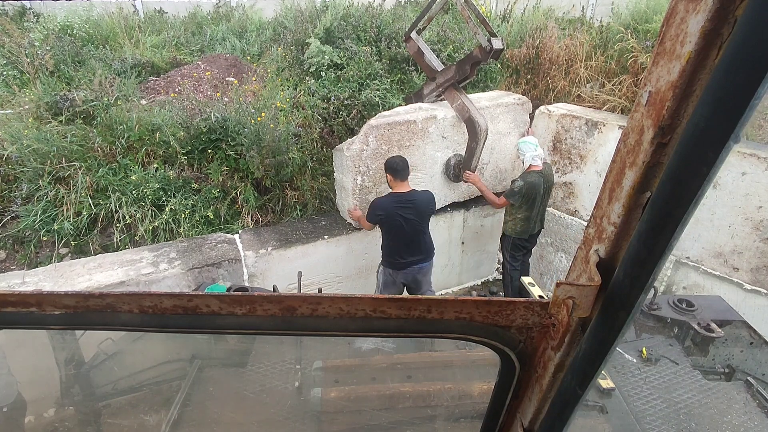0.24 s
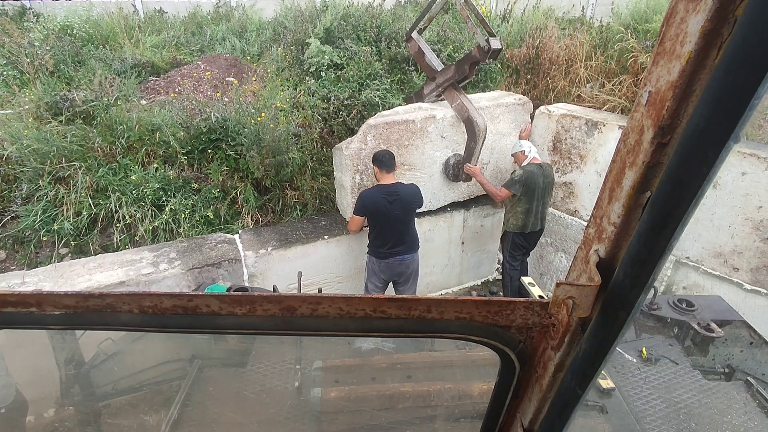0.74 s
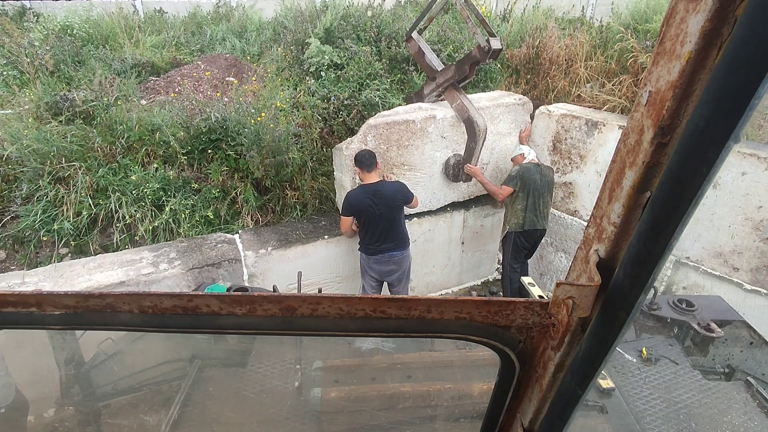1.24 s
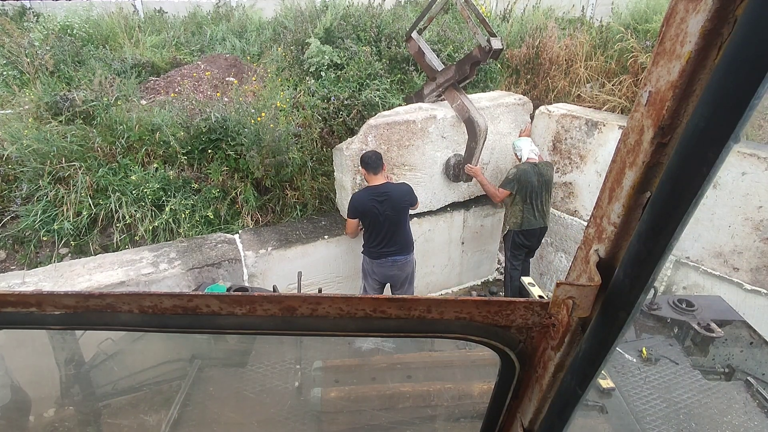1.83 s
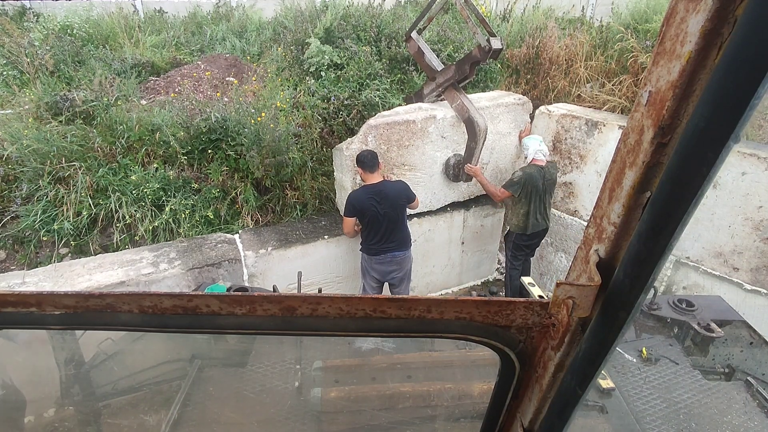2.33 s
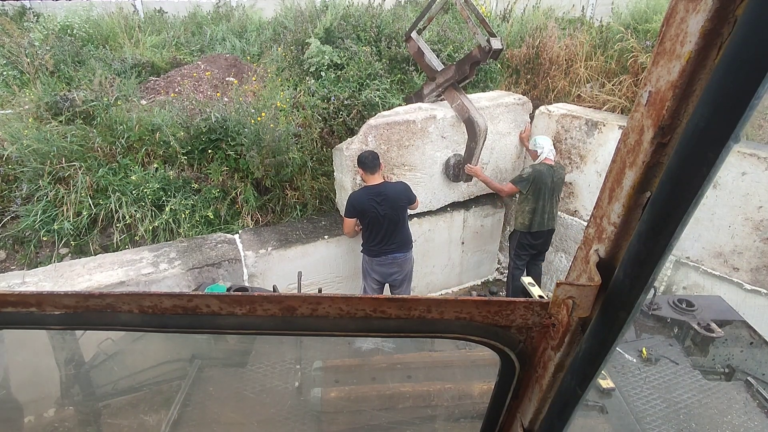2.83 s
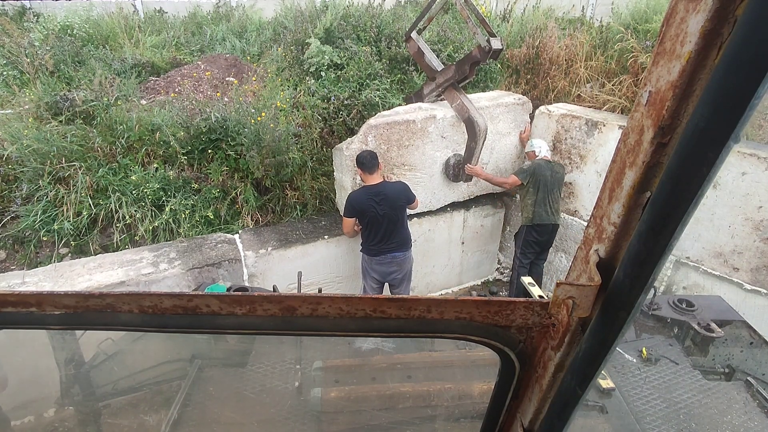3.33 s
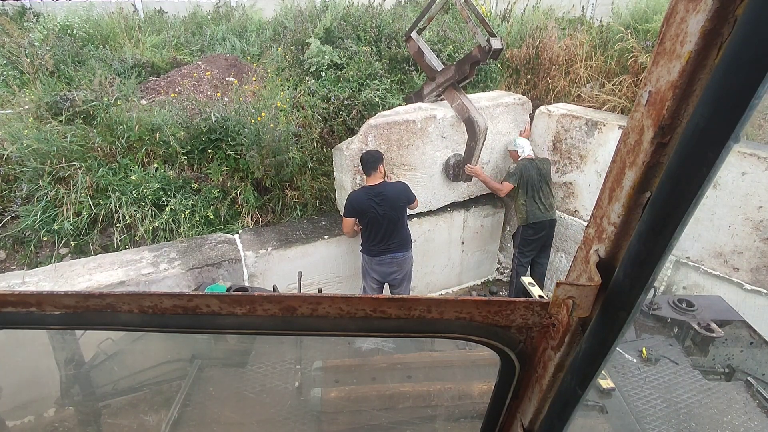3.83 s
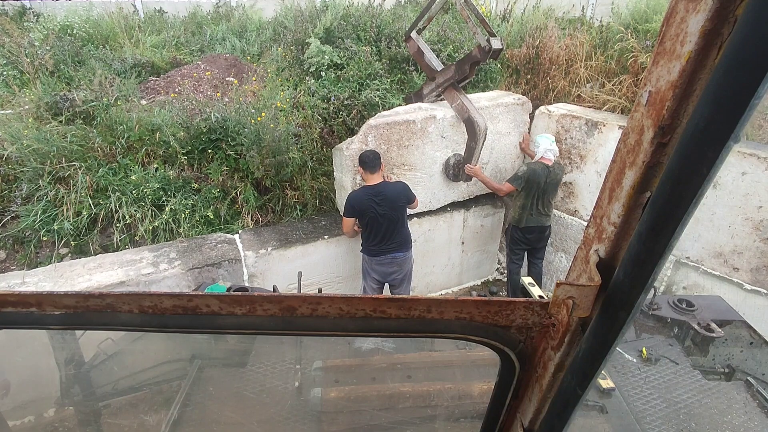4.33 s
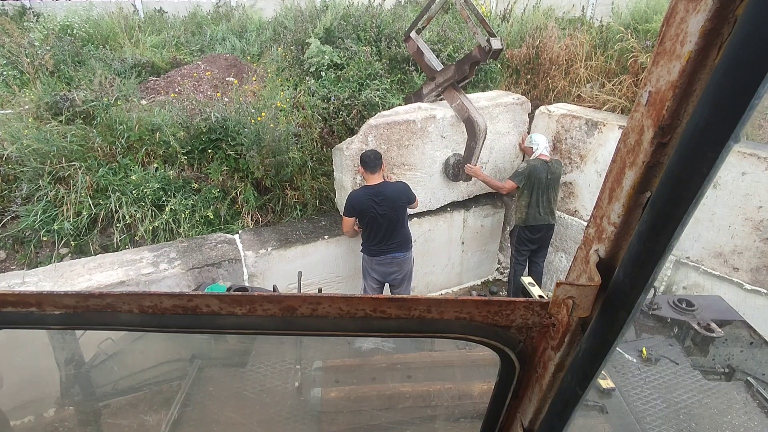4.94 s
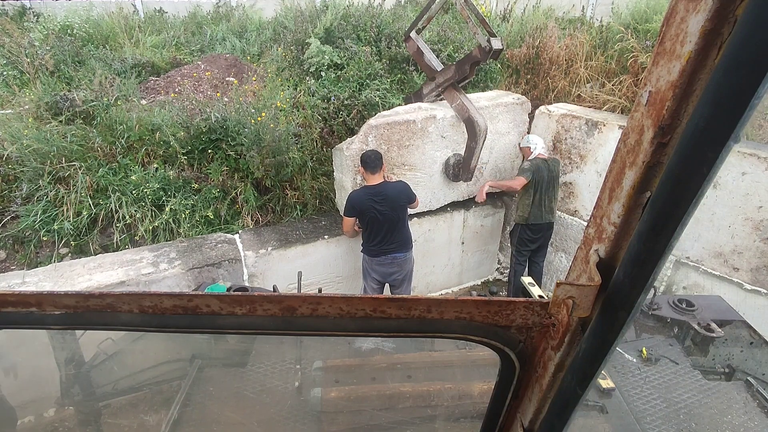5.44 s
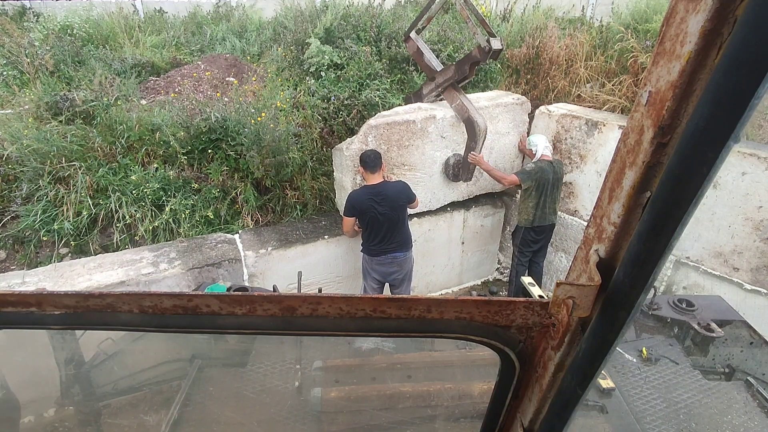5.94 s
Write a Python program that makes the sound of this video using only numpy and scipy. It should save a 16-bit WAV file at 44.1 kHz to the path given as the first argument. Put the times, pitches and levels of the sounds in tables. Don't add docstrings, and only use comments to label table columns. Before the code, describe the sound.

Inside a crane cab, a diesel engine idles with deep rumble, clatter and loose panel knocks, then hydraulic oil hisses in spurts at the very end.

```python
import sys
import numpy as np
from scipy import signal
from scipy.fft import dct
from scipy.io import wavfile
from scipy.ndimage import uniform_filter1d

SR = 44100
rng = np.random.default_rng(int(sys.argv[2]) if len(sys.argv) > 2 else 0)


def volts(x):
    e = np.asarray(x, float) / 20
    return 10 ** e


def log_audio(samples):
    frames = np.atleast_2d(samples).T
    limited = np.clip(frames, -1, 1)
    pcm = np.round(limited * 32767).astype(np.int16)
    wavfile.write(sys.argv[1], SR, pcm)


N = 273358

# start_s, opening (0-1)
VALVE = [
    (0, 0.05),
    (5.84, 0.06),
    (5.93, 0.6),
    (6.0, .95),
    (6.2, 1),
]
# centre_s, gain_db, half_length_s
BURSTS = [
    (5.952, 3, 0.045),
    (5.995, 2, 0.012),
    (6.031, 3.5, 0.014),
    (6.068, 4, 0.0095),
    (6.112, 4.5, 0.015),
    (6.135, 3.5, .008),
    (6.155, 6, 0.012),
]
# pitch_hz, likeness (0-1)
LIKENESS = [(35, .9999), (60, .99), (120, .991), (260, .975), (410, .9), (670, .3), (1080, 0), (6500, 0),
            (9000, .7), (14000, .5)]


def rms_one(x):
    return x / np.sqrt(np.mean(x ** 2) + 1e-20)


def in_time(rows):
    s, *columns = np.transpose(rows)
    return [np.interp(np.arange(N) / SR, s, c) for c in columns]


def at_hz(points, hz):
    pitch_hz, value = np.transpose(points)
    return np.interp(np.log(hz), np.log(pitch_hz), value)


def swells(rows, s):
    return sum(db * np.exp(-((s - at) / half) ** 2) for at, db, half in rows)


def drift(rate):
    r = np.exp(-80 * np.pi * rate / SR)
    noise = rng.standard_normal(N // 40 + 2002)
    slow = signal.lfilter([1], [1, -2 * r, r * r], noise)[2000:]
    return np.interp(np.arange(N) / 40, np.arange(len(slow)), rms_one(slow))


def resonance(x, hz, width):
    r = np.exp(-np.pi * width / SR)
    zeros = np.array([1, 0, -1]) * (1 - r * r) / 2
    return signal.lfilter(zeros, [1, -2 * r * np.cos(2 * np.pi * hz / SR), r * r], x)


def ports(hz):
    # pitch_hz, level_db
    shade = [(260, 0), (410, -.8), (520, -3), (670, -7), (1080, -11.5), (2000, -16), (4000, -21),
             (7000, -26), (10000, -16), (13000, -4), (15500, 0)]
    left = volts(at_hz(shade, hz))
    return np.array([[left], [1]]) * 2 / (1 + left)


def spread(mid, side, hz):
    alike = np.clip(at_hz(LIKENESS, hz), -1, 1)
    return np.sqrt(1 + alike) * mid + np.sqrt(1 - alike) * side * [[1], [-1]]


def banded_noise(spectrum, patchy_db, patch_rate):
    low_hz, top_hz = spectrum[0][0], spectrum[-1][0]
    edges = np.geomspace(low_hz, top_hz, int(3 * np.log2(top_hz / low_hz)) + 2)
    out, together, white = 0, drift(patch_rate), rng.standard_normal((2, 2, N))
    for k, (low, high) in enumerate(zip(edges, edges[1:])):
        band_pass = signal.butter(2, [low, high], "band", fs=SR, output="sos")
        mid, side = signal.sosfilt(band_pass, white[k % 2])
        hz = np.sqrt(low * high)
        flicker_db = patchy_db * (0.83 * together + drift(patch_rate))
        gain = volts(at_hz(spectrum, hz) + flicker_db)
        out = out + gain * ports(hz) * spread(mid, side, hz)
    return out / np.sqrt(np.mean(out.mean(axis=0) ** 2))


def narrow_hiss(noise, hz, width):
    return rms_one(resonance(resonance(noise, hz, width), hz, width))


def microphone_hiss():
    # pitch_hz, level_db (per Hz)
    hiss_spectrum = [(7500, -16), (8900, -16), (10500, -8), (11800, -3), (13300, -12), (14300, -7),
                     (15000, -2), (15500, 0)]
    return volts(-84.5) * banded_noise(hiss_spectrum, patchy_db=3.5, patch_rate=12.0)


def whistles():
    # pitch_hz, width_hz, level_db
    whistle_bands = [(11000, 200, -95), (11800, 150, -90), (12400, 250, -94), (14650, 300, -88),
                     (15300, 250, -85)]
    noise = rng.standard_normal(N) + .6 * rng.standard_normal((2, N))
    together, out = drift(3.0), 0
    for hz, width, db in whistle_bands:
        out = out + volts(db + 2 * together + 5 * drift(16.0)) * narrow_hiss(noise, hz, width)
    return out


def rumble(stumble_db):
    # pitch_hz, width_hz, level_db
    cab_modes = [(9.7, 12, -15.5), (26, 26, -10), (39.3, 19, 1), (60.6, 22, 0.5), (90, 18, -10),
                 (117, 24, -2.5), (186.3, 36, -5), (199.5, 13, -9), (232, 36, -19.5), (329.6, 55, -11.5),
                 (378.3, 28, -13), (414.4, 76, -12), (512, 20, -16.5), (531.8, 44, -17), (1230, 70, -26.5)]
    mid, side = rng.standard_normal((2, N))
    boom = 0
    for k, (hz, width, mode_db) in enumerate(cab_modes):
        push = spread(mid, side, hz)
        mode = resonance(resonance(push, hz, 1.5 * width), hz, 1.5 * width)
        power = np.mean(mode ** 2, axis=0)
        swell = uniform_filter1d(power, size=3500) / np.mean(power)
        evened = mode / (swell + .05) ** .35
        boom = boom + (-1) ** k * volts(mode_db) * ports(hz) * evened
    return volts(-23 + 0.44 * np.minimum(stumble_db, 4)) * rms_one(boom)


def thumps():
    # start_s, peak_db, pitch_hz
    heavy_firings = [(1.0, -19, 121), (1.096, -20, 132), (1.182, -24, 117), (4.565, -16, 194),
                     (4.663, -22, 114), (4.669, -15.5, 197), (4.696, -19.5, 151), (4.751, -12.5, 119.6),
                     (4.763, -12.5, 162), (5.117, -17.5, 128), (5.125, -18, 201.6), (5.158, -12.5, 126),
                     (5.738, -13.5, 90), (5.807, -15.5, 110), (5.897, -12.5, 102)]
    # start_s, peak_db, pitch_hz
    light_firings = [(0.908, -22, 181), (1.275, -19.5, 188), (1.579, -19.5, 181), (1.927, -21, 201),
                     (2.034, -20, 189), (2.342, -19, 193), (2.831, -19, 195), (2.926, -17.5, 186),
                     (3.202, -21, 167), (3.419, -17.5, 191), (3.758, -21, 185), (4.061, -17.5, 192),
                     (4.419, -18, 170), (4.85, -21, 143), (5.2, -18.5, 186), (5.345, -22.5, 206)]
    firings = heavy_firings + [(s - .003, db - 3.0, hz) for s, db, hz in light_firings]
    out, t = np.zeros(N + 6000), np.arange(6000) / SR
    envelope = (1 - np.exp(-t / 0.0011)) * np.exp(-t / 0.016)
    for s, peak_db, hz in firings:
        at = round(s * SR)
        out[at:at + len(t)] -= volts(peak_db) * envelope * np.sin(2 * np.pi * hz * t)
    return out[:N]


def panel():
    # start_s, peak_db, pitch_hz
    knocks = [(.1476, -28.5, 1210), (.5197, -28, 1276), (0.9634, -30.5, 1300), (2.0113, -27.5, 1250),
              (2.5631, -32, 1240), (2.7666, -32, 1245), (2.9048, -30, 1105), (2.9582, -28.5, 1230),
              (3.1687, -29, 1250), (3.469, -29, 1220), (3.7145, -31, 1210), (3.8367, -30, 1170),
              (3.9704, -30, 1270), (4.2078, -32, 1270), (4.3735, -29, 1150), (4.4104, -31, 1120),
              (4.8426, -23.5, 1210), (4.9503, -33, 1234), (5.117, -29, 1195), (5.2004, -25, 1224),
              (0.444, -28, 1240), (0.4952, -27.5, 1276), (0.9952, -23, 1280), (1.1645, -33.5, 1197),
              (1.446, -25.5, 1274), (1.529, -27.5, 1224), (1.5767, -20, 1153), (2.092, -28.5, 1280),
              (2.141, -27, 1214), (2.345, -25, 1250), (2.493, -22, 1213), (2.595, -31.5, 1260),
              (2.7212, -25, 1170), (2.824, -24, 1240), (3.065, -28, 1255), (3.205, -19, 1234),
              (3.7645, -27, 1283), (4.002, -39, 1110), (4.3211, -23.5, 1240), (4.481, -24, 1040),
              (4.6965, -21.5, 1246), (4.876, -25.5, 1240), (5.2512, -28, 1230), (5.338, -23.5, 1185),
              (5.4814, -22.5, 1160), (5.6833, -20, 1160), (5.7895, -27, 1190), (5.925, -25, 1080),
              (5.971, -25, 1320), (6.178, -39, 1420), (2.041, -31, 1160), (2.98, -26, 1250),
              (4.344, -29.5, 1210), (5.764, -30, 1210), (1.75, -30, 1270), (1.793, -26, 1260)]
    # start_s, peak_db, pitch_hz
    low_knocks = [(0.279, -27, 620), (0.728, -30, 630), (0.89, -27.5, 786), (1.38, -25, 956),
                  (1.896, -27, 650), (2.372, -31, 670), (2.772, -27, 775), (3.231, -27, 893),
                  (3.809, -26, 670), (4.206, -24.5, 760), (4.346, -28, 910), (4.419, -30, 673),
                  (4.793, -29, 620), (4.839, -32, 929), (5.116, -29.5, 720), (5.179, -23, 695),
                  (5.442, -26, 869), (5.528, -23, 990), (5.743, -29, 640)]
    # start_s, peak_db, pitch_hz, decay_s
    long_rings = [(1.902, -23.5, 1230, 0.014), (6.005, -33, 1160, 0.037), (6.085, -27, 1210, 0.013),
                  (6.125, -28.5, 1000, 0.0099), (6.075, -32, 407, .03), (5.43, -25.5, 873, 0.02),
                  (5.888, -28, 740, 0.025), (5.945, -27, 760, 0.014), (5.113, -27, 724, 0.0071),
                  (5.94, -29.5, 1410, 0.017), (5.955, -32, 1630, 0.012), (5.99, -26, 606, 0.045),
                  (6.025, -28, 723, 0.021), (6.048, -32, 1162, 0.031), (6.169, -27, 1458, 0.052)]
    hits = [(s, db + 0.5, hz, .007) for s, db, hz in knocks]
    hits += [(s - .003, db - 3.0, hz, .008) for s, db, hz in low_knocks]
    out, t = np.zeros(N + 6000), np.arange(6000) / SR
    blunt_start = 1 - np.exp(-t / 0.0034)
    for s, peak_db, hz, decay_s in hits + long_rings:
        at = round(s * SR)
        ring = np.exp(-t / decay_s) * np.sin(2 * np.pi * hz * t)
        out[at:at + len(t)] += volts(peak_db) * blunt_start * ring
    return out[:N] * volts([[-12], [4.5]])


def clatter(stumble_db, burst_db):
    # pitch_hz, level_db (per Hz)
    clatter_spectrum = [(540, -8), (640, -1.5), (780, -0.5), (1000, -4.5), (1240, -4.5), (1450, -7.5),
                        (1900, -10), (2500, -20.5), (3200, -14.5), (4000, -27), (4500, -29), (5200, -27),
                        (6300, -71), (8000, -65)]
    level_db = -36.79 + 0.31 * np.minimum(stumble_db, 0) + 1.5 * burst_db
    noise = volts(level_db) * banded_noise(clatter_spectrum, patchy_db=1.35, patch_rate=30.0)
    return signal.sosfilt(signal.butter(6, 6427, fs=SR, output="sos"), noise)


def oil(opening, burst_db):
    # pitch_hz, level_db (per Hz)
    rush_spectrum = [(2300, -5), (3200, 0.5), (4200, -8.5), (5200, -8), (6200, -12), (6700, -30)]
    # pitch_hz, level_db (per Hz)
    jet_spectrum = [(7500, -26), (10000, -15), (12000, -7), (13500, 0), (14500, 0), (15600, -12)]
    rush = volts(-49 + burst_db) * banded_noise(rush_spectrum, patchy_db=5.0, patch_rate=56.0)
    jet_db = -63.5 - 6.5 * (0.5 - opening) + .3 * burst_db
    jet = volts(jet_db) * banded_noise(jet_spectrum, patchy_db=1.0, patch_rate=22.0)
    jet = signal.sosfilt(signal.butter(8, 14700, fs=SR, output="sos"), jet)
    noise = rng.standard_normal(N) + .6 * rng.standard_normal((2, N))
    whistle = volts(-72 + .4 * burst_db) * narrow_hiss(noise, 14000, 400)
    return opening * (rush + jet + whistle)


def pump(opening, stumble_db):
    # start_s, level_db
    whine = [(0.0, -37.5), (1.69, -35), (2.11, -40.5), (2.16, -32), (2.5, -37.5), (3.95, -31.5),
             (4.07, -45), (4.11, -38), (4.42, -34.5), (4.7, -46.5), (5.06, -31), (5.11, -43.5),
             (5.37, -34.5), (5.4, -52), (5.51, -32.5), (5.91, -43), (5.945, -25.5), (5.97, -22.5),
             (6.03, -28.5), (6.06, -29.5), (6.11, -31), (6.2, -39)]
    # start_s, level_db
    drone = [(0.0, -26), (0.17, -22), (0.22, -32.5), (0.26, -22.5), (1.29, -25.5), (1.33, -33), (1.45, -20),
             (1.5, -30), (1.57, -24.5), (4.09, -25), (4.52, -23.5), (4.61, -27), (4.8, -20), (4.87, -25),
             (5.82, -25.5), (6.01, -32), (6.06, -23), (6.2, -28)]
    # order, idle_db, load_gain_db
    upper_orders = [(2, -35, 5.5), (3, -38.5, 4.5), (4, -45.5, 11.5), (6, -58.5, 17.5), (7, -59, 19),
                    (8, -65.5, 12), (9, -60.5, 12.5), (10, -64.5, 15.5), (11, -65, 17), (12, -60, 12),
                    (14, -68.5, 11), (15, -64.5, 18)]
    piston_hz, whine_order = 102.15, 4.987
    whine_db, = in_time(whine)
    drone_db, = in_time(drone)
    drone_db = -24.0 + 0.5 * (drone_db - drone_db.mean()) + 0.66 * stumble_db
    levels = [(whine_order, whine_db + 0.5), (1, drone_db)]
    for k, idle_db, load_db in upper_orders:
        level_db = idle_db + load_db * opening + stumble_db * min(1, 1.1 / k)
        if k == 2:
            level_db = level_db + swells([(4.2, 4.6, .3)], np.arange(N) / SR)
        levels.append((k, level_db))
    turn = 2 * np.pi * np.cumsum(piston_hz + .3 * drift(3.0)) / SR
    out, sway = 0, .6 * drift(4.0)
    for k, level_db in levels:
        is_whine = k == whine_order
        tremble = (.55 + .06 * k) * drift(4.0) + (.5 + .02 * k) * drift(9.0)
        shake = sway - np.pi / 2 + tremble * (.45 if is_whine else 1)
        load_flicker_db = 0 if is_whine else 4.5 * opening * min(1, k / 6) * drift(28.0)
        gain = np.sqrt(2) * volts(level_db + 1.3 * drift(5.6) + load_flicker_db)
        port_sway = .075 * np.sqrt(k) * drift(0.73) * [[.5], [-.5]]
        out = out + ports(k * piston_hz) * gain * np.sin(k * turn + shake + port_sway)
    return out


def scene():
    # centre_s, gain_db, half_length_s
    stumbles = [(0.08, -4.5, 0.0081), (0.24, -3, 0.028), (1.005, 5, 0.0068), (1.1, 8, 0.0087),
                (1.19, 2, 0.0069), (1.37, -4, 0.02), (1.67, -2.5, 0.013), (2.82, -1, 0.014),
                (4.04, -6, 0.022), (4.4, -4.5, 0.0062), (4.47, 1, 0.029), (4.58, 4, 0.037),
                (4.63, -10, 0.039), (4.68, 7.5, 0.035), (4.735, -9.5, 0.016), (4.768, 11, 0.0071),
                (4.81, 1, 0.013), (5.095, -16, 0.011), (5.14, 2.5, 0.023), (5.84, -10.5, 0.0089),
                (5.9, 4, 0.0079), (5.96, -2, 0.019)]
    opening, = in_time(VALVE)
    s = np.arange(N) / SR
    stumble_db, burst_db = swells(stumbles, s), swells(BURSTS, s)
    background = microphone_hiss() + whistles()
    engine = rumble(stumble_db) + thumps() + panel() + clatter(stumble_db, burst_db)
    return background + engine + oil(opening, burst_db) + pump(opening, stumble_db)


def starved(x):
    # pitch_hz, step_db (over the band's mean), spread_db (of the step)
    band_steps = [(60, -34, 1), (150, -22, 1), (300, -12, 2), (1500, -1, 3), (2200, 8, 4), (3000, 5.5, 3.5),
                  (3800, 6.5, 3.5), (4500, 11.5, 4), (5200, 9, 4), (5600, 12, 4), (6300, 9, 3),
                  (8000, 12, 3), (15000, 12.5, 5)]
    hop = 1024
    starts = np.arange(0, N + hop, hop)
    window = np.sin(np.pi * (np.arange(2 * hop) + .5) / 2 / hop)
    padded = np.pad(x, ((0, 0), (hop, 2 * hop)), "reflect")
    frames = padded[:, starts[:, None] + np.arange(2 * hop)] * window
    a, b, c, d = np.split(frames, 4, axis=2)
    lines = dct(np.dstack([-c[..., ::-1] - d, a - b[..., ::-1]]), type=4, norm="ortho")
    hz, s = (np.arange(hop) + .5) * SR / 2 / hop, starts / SR
    band = np.round(9 * np.log2(np.maximum(hz, 200) / 200)).astype(int)
    by_band = rng.standard_normal((2, len(s), band.max() + 1))[:, :, band]
    chance = .4 * rng.standard_normal((len(s), 1)) + .85 * by_band
    opening = np.interp(s, *np.transpose(VALVE))
    chance *= 1 - .5 * opening[:, None]
    mean = uniform_filter1d(uniform_filter1d(np.abs(lines), size=15, axis=2), size=5, axis=1)
    centre, step_db, spread_db = np.transpose(band_steps)
    step_db = np.interp(hz, centre, step_db) + np.interp(hz, centre, spread_db) * chance
    step = mean * volts(step_db - 2.0 * opening[:, None] * (hz < 5200)) + 1e-12
    lines = np.sign(lines) * np.floor(np.abs(lines) / step + .4) * step
    between_bursts = (opening > .72) & (swells(BURSTS, s) < 2.0)
    moving = (opening > .62) & (opening < .95)
    losses = [(between_bursts | moving, 1700, 2200), (moving, 5100, 6400), (opening > .5, 6400, 9000)]
    for when, low, high in losses:
        lines[:, when] *= 1 - .95 * ((hz > low) & (hz < high))
    first, second = np.split(dct(lines, type=4, norm="ortho"), 2, axis=2)
    rising = np.dstack([second, -second[..., ::-1]]) * window[:hop]
    falling = np.dstack([first[..., ::-1], first]) * window[hop:]
    out = np.zeros_like(padded)
    out[:, :len(s) * hop] += rising.reshape(2, -1)
    out[:, hop:(len(s) + 1) * hop] -= falling.reshape(2, -1)
    return out[:, hop:hop + N]


def roll_off(x):
    return signal.sosfilt(signal.butter(12, 15780, fs=SR, output="sos"), x)


def record(dry):
    # centre_s, gain_db, half_length_s
    lulls = [
        (5.925, -4, .005),
        (6.011, -4, .006),
        (6.05, -8, .006),
        (6.089, -8, .007),
        (6.124, -5, .004),
        (6.146, -5, .004),
        (6.185, -6, .012),
    ]
    coarse = starved(dry)
    ripple = np.cos(2 * np.pi * np.arange(N) / 1024 - 2.0)
    bass = signal.sosfiltfilt(signal.butter(2, 800, fs=SR, output="sos"), coarse)
    joined = coarse + ripple * (.07 * bass + .15 * (coarse - bass))
    band_pass = signal.butter(3, [1650, 7000], "band", fs=SR, output="sos")
    treble = signal.sosfiltfilt(band_pass, joined)
    mix = joined + treble * (volts(swells(lulls, np.arange(N) / SR)) - 1)
    return roll_off(mix)


dry = scene()
out = record(dry)
log_audio(out)
```